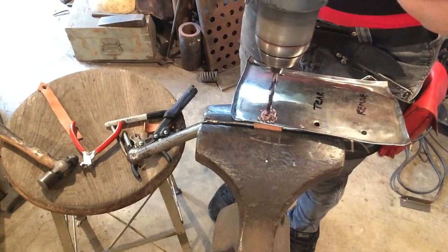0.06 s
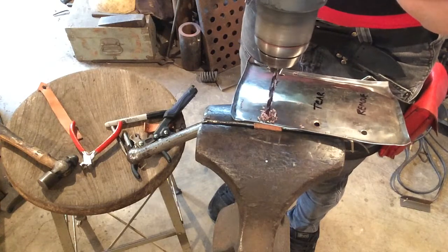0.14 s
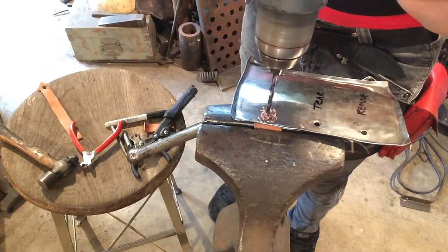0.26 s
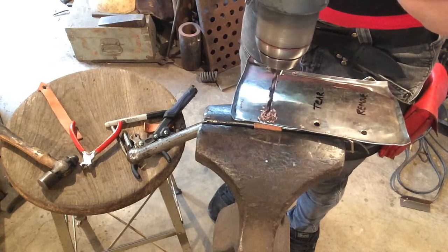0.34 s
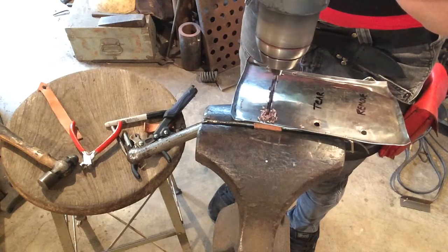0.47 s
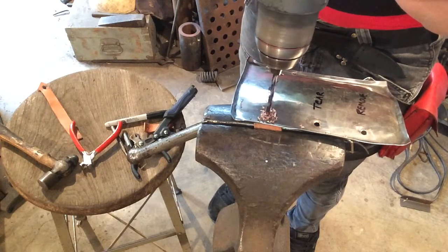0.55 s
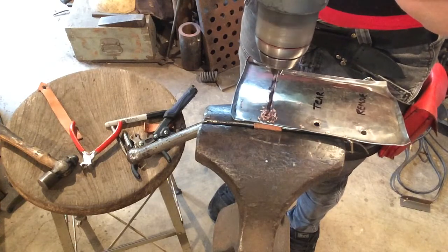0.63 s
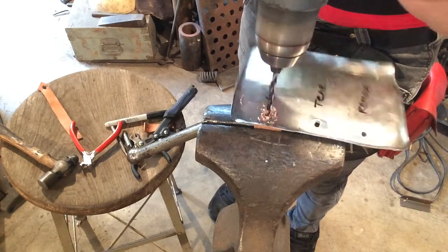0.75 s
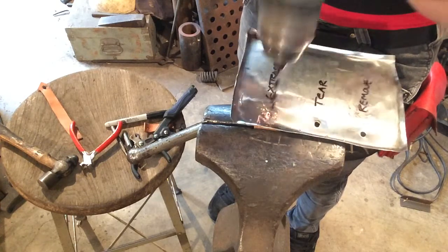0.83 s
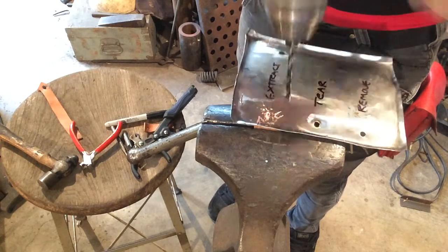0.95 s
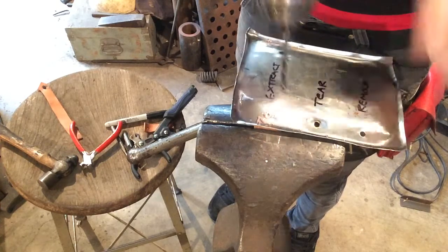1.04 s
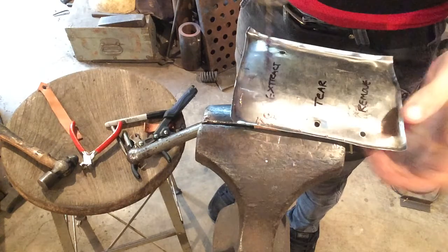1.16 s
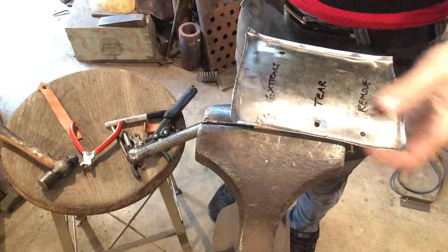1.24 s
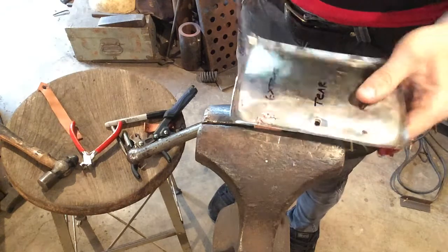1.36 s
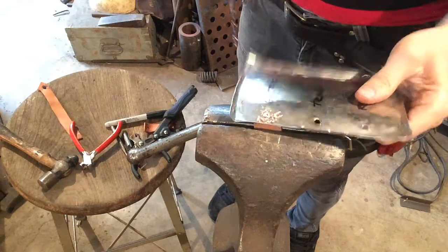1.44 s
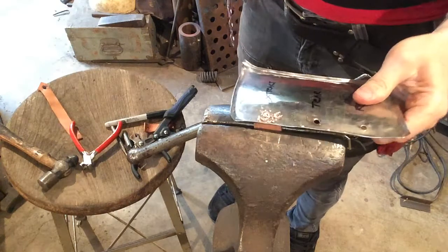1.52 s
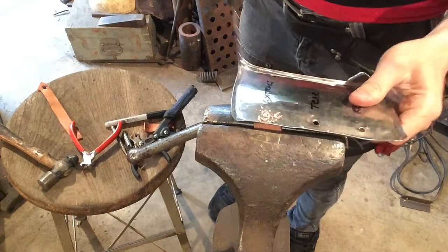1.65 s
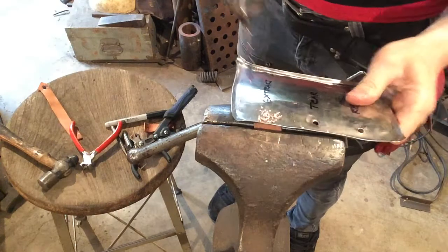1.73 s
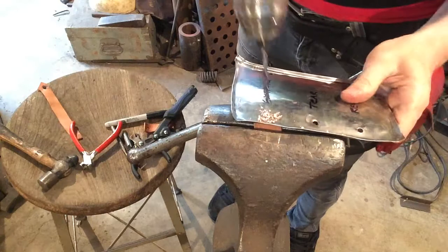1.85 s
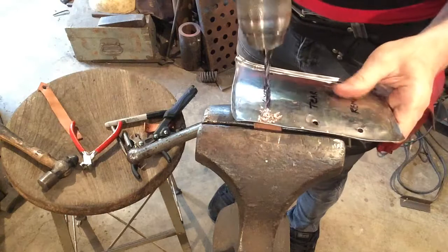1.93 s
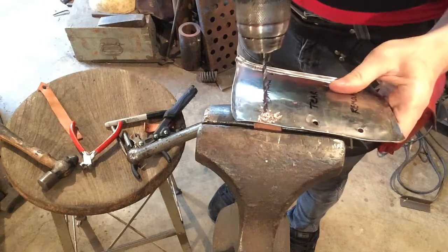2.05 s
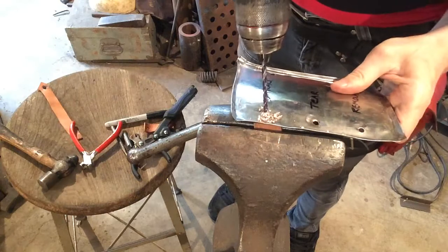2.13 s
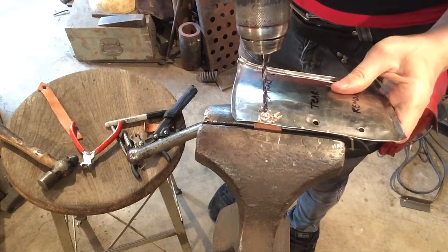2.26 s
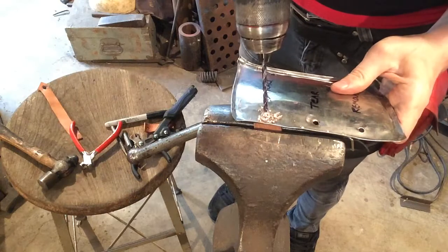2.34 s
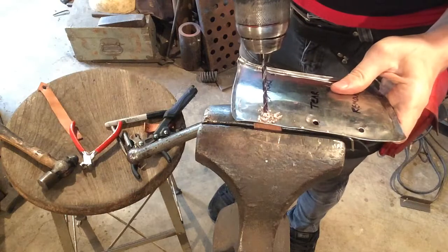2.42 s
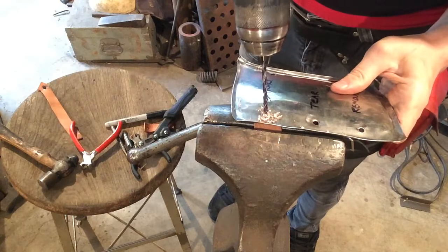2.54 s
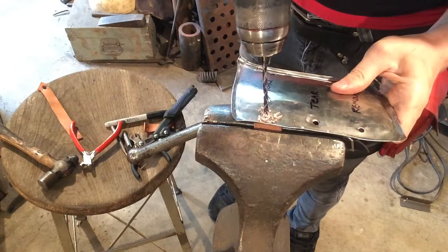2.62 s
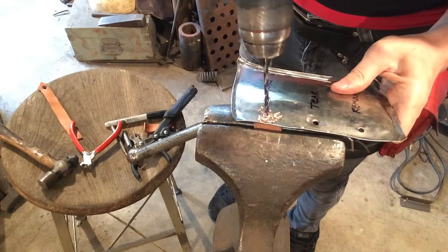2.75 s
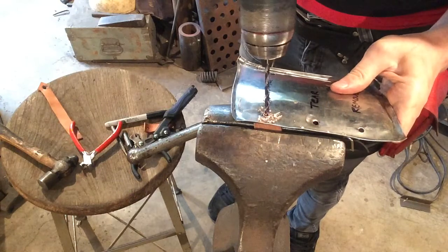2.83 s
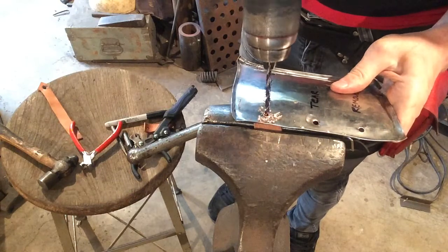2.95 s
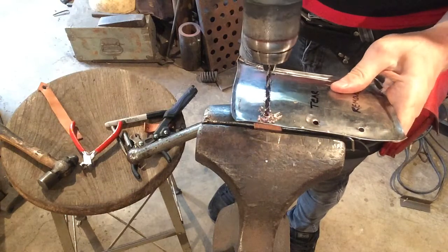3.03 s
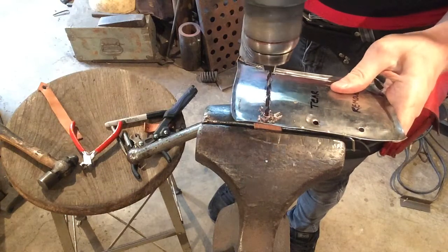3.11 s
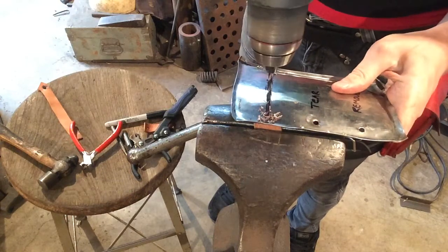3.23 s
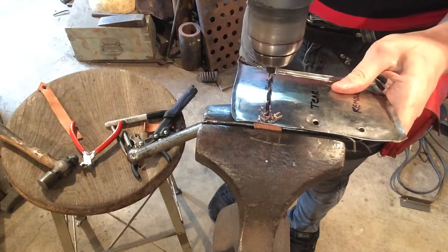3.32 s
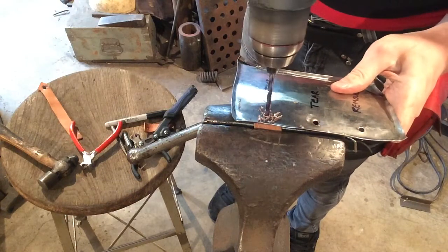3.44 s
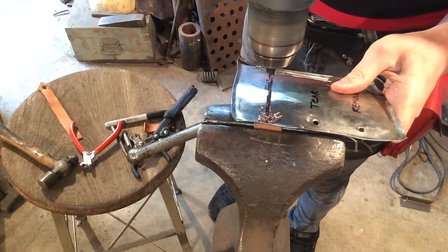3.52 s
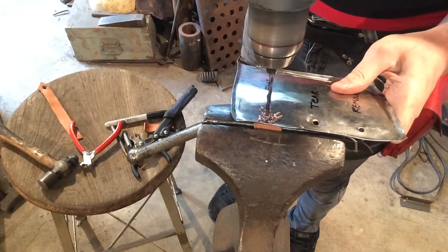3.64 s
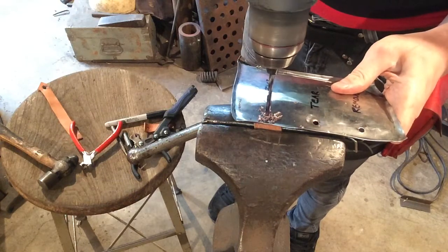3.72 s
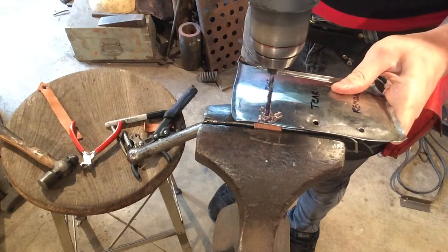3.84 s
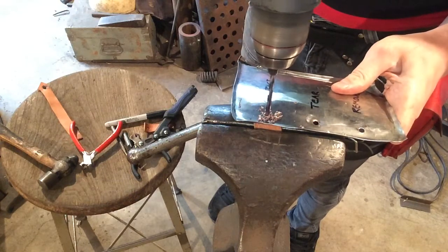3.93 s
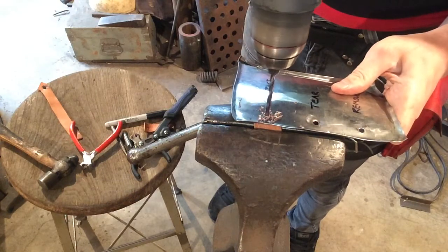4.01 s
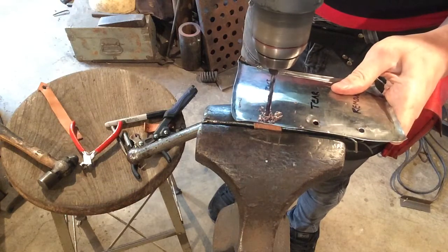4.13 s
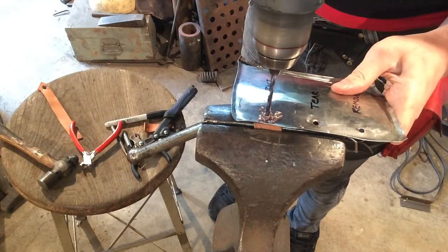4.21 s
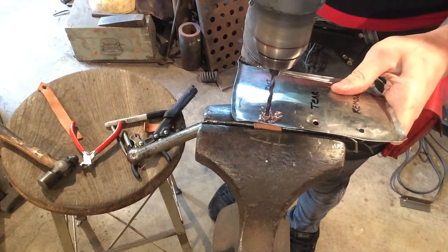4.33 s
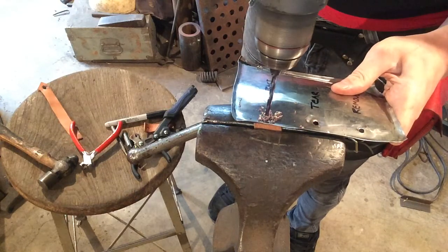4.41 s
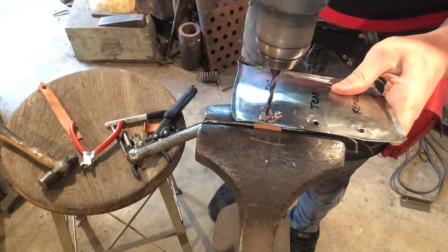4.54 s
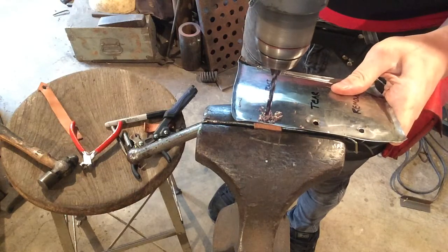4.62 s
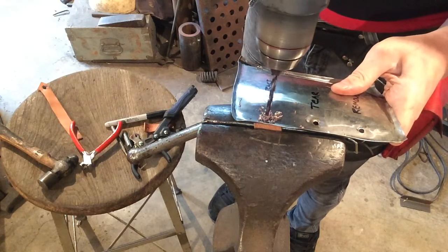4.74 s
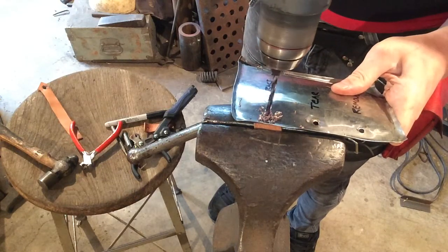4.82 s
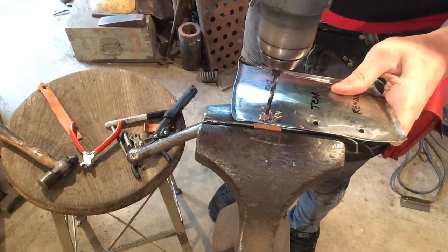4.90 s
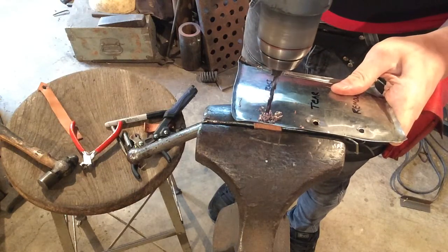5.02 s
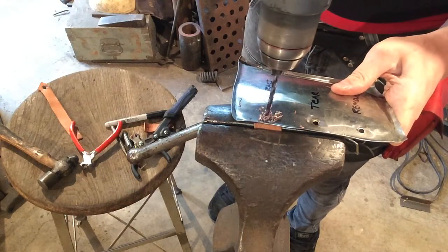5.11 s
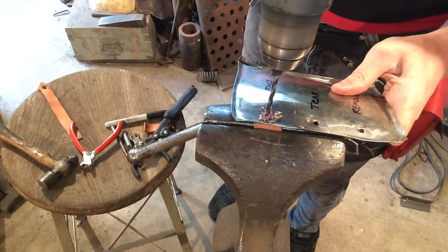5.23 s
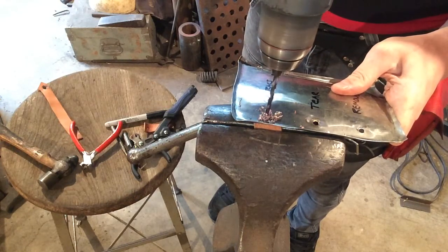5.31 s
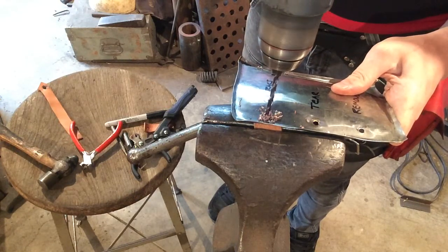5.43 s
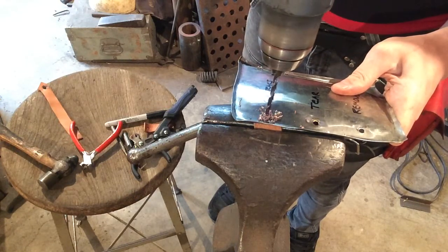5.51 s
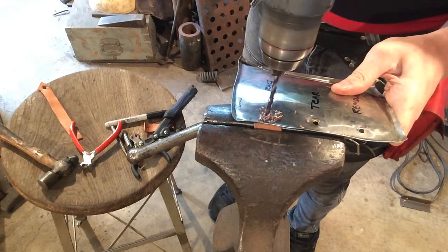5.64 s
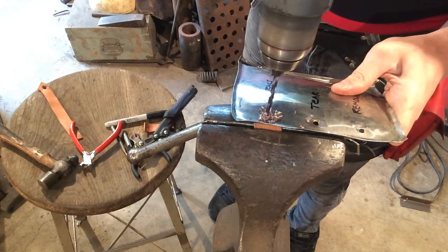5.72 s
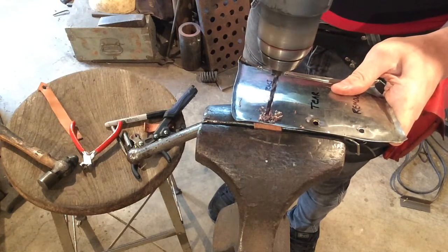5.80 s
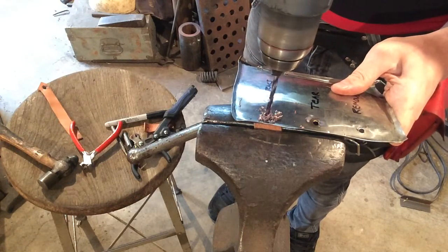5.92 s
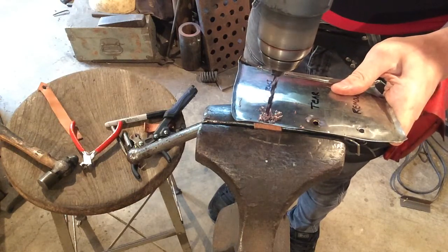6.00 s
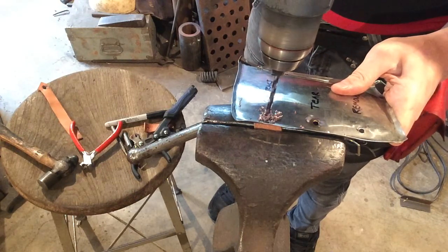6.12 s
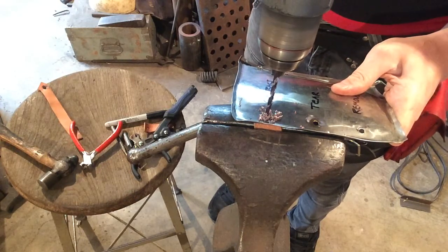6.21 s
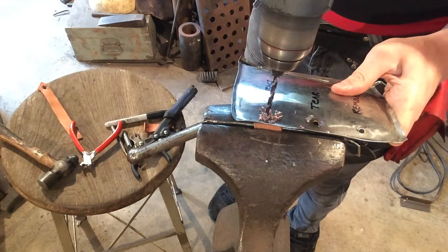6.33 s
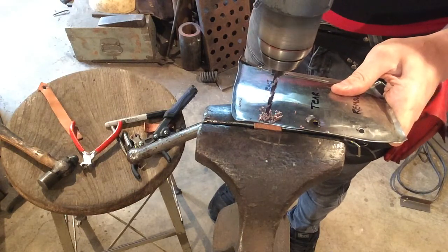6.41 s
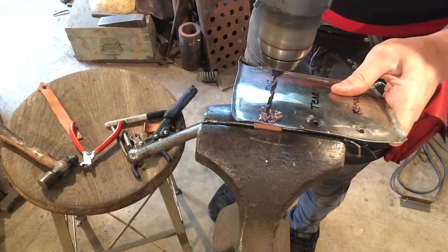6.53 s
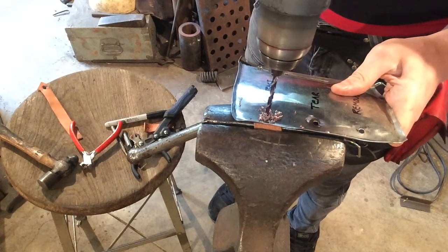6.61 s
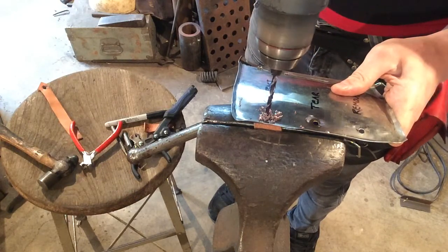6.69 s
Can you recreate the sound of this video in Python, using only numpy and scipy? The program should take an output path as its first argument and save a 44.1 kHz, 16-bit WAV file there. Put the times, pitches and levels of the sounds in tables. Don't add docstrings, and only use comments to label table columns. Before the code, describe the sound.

An electric drill whines through metal, brakes to a clunking stop, then after quiet handling and a small plate clank chatters back up to a faster scream.

```python
import sys
import numpy as np
from scipy import signal
from scipy.fft import rfft, irfft
from scipy.io import wavfile
from scipy.ndimage import uniform_filter1d

SR = 44100
rng = np.random.default_rng(int(sys.argv[2]) if len(sys.argv) > 2 else 0)


def invert_db(level):
    return 10 ** (np.asarray(level, dtype=float) / 20)


def transcribe(signal):
    frames = np.atleast_2d(signal).T
    limited = np.clip(frames, -1, 1)
    pcm = np.round(limited * 32767).astype(np.int16)
    wavfile.write(sys.argv[1], SR, pcm)


N = 298116
TIME_S = np.arange(N) / SR
BINS_HZ = np.arange(N // 2 + 1) * SR / N + 1e-3

# time_s, turns_hz
HELD_SPEED = [(0, 184.3), (.05, 185), (.24, 184.8), (.36, 180.8), (.43, 181.8), (.56, 184.3), (.7, 184.9),
              (.77, 186), (.86, 186.3), (5.2, 180.5), (5.35, 181.7), (5.48, 182.1), (5.65, 178.3),
              (5.9, 180.3), (5.98, 180.6), (6.06, 181.6), (6.26, 181), (6.38, 177.8), (6.47, 177.1),
              (6.55, 176.9), (6.68, 175.7), (6.76, 176.8)]
# time_s, push_db
FEED = [(0, 3), (.25, 2.5), (.55, 1), (.7, 3.5), (.86, 1.5), (.95, -4), (1.02, -12), (3.4, 7), (3.85, 5),
        (4.3, -4.5), (4.6, -5.5), (5.0, 0), (5.45, 1), (5.75, 0.5), (6.04, 0.5), (6.22, -1.5), (6.36, 2.5),
        (6.76, 4)]
# time_s, shift_hz, half_length_s
SPEED_DRIFT = [(3.43, -1.1, .06), (3.62, -.4, .18), (4.55, -1.1, .07), (4.86, .8, .13)]
# gap_hz still to gain, lag_s
SPIN_UP_LAGS = [
    (140, .066),
    (126, .25),
]
# time_s, shift_hz, half_length_s
SPIN_UP_DIP = [(3.207, -12.5, .021)]
LIFT_S, BRAKE_S, STOP_S, START_S, EASE_S = .68, .86, 1.015, 3.145, 4.45
BRAKE_HZ_PER_S, FREE_HZ, EASE_LAG_S, COAST_S = 222, 266.8, .3, 0.015

WHINE_ORDER, PARTNER_ORDER, TOOTH_ORDER, MERGING_ORDER = 16, 20, 14, 10
WHINE_DB, WHINE_PUSH, WHINE_WAVER_DB = -31.5, 0.53, 1.2
PARTNER_DB, PARTNER_FLAT_DB, PARTNER_DB_PER_OCTAVE = -47.5, -53.5, -9.5
PARTNER_LIFT_DB, PARTNER_BRAKE_DB, PARTNER_TORQUE = 10, -13, 4.36
LOCK_HZ = 138
TORQUE_DB, TORQUE_HZ_PER_S = 4, 390
OCTAVE_S, OCTAVE_DB, OCTAVE_HALF_S = 3.213, -44, .019
# centre_hz, width_hz, gain_db
VENTS = [(2935, 680, -0.5), (2677, 140, -1.5), (3780, 550, -12)]
VENT_STEEPNESS = 2.4
# time_s, change_db, half_length_s
WHINE_SWELLS = [(0, -8, 0.03), (.1, -1, .08), (.14, -2.5, 0.015), (.55, 2, 0.044), (.31, -17, 0.0074),
                (.4, -29, 0.017), (.476, -22, 0.0075), (.66, -10, 0.12), (.37, -13, 0.009), (.69, -4, .012),
                (.714, 7.5, 0.017), (.752, -8, .009), (.786, -8, 0.012), (.81, 3.5, 0.022), (.885, 0, .015),
                (3.238, -14, 0.013), (3.53, -6, 0.13), (3.35, -7.5, 0.036), (4.1, -1, 0.1), (4.245, 6.5, 0.016),
                (4.305, 11, 0.041), (4.43, 10, 0.013), (4.225, -21, 0.008), (4.372, -27, 0.0093),
                (4.405, -7, 0.016), (4.452, -27, 0.0055), (4.54, -2, 0.037), (4.61, -8, .028), (4.86, 0, .03),
                (4.66, -1, .02), (3.44, 2.5, .05), (3.75, 3.5, 0.13), (3.27, -3.5, 0.015), (4.88, -6.5, 0.1),
                (4.19, 2, 0.023), (5.135, -18, 0.0046), (5.308, -25, 0.0036), (5.436, -6, 0.0035),
                (5.48, 5.5, 0.017), (5.535, -14.5, 0.0044), (5.572, 3.5, 0.013), (5.592, -17, 0.0039),
                (5.62, -5, 0.022), (5.642, -14, 0.0036), (5.69, 2.5, 0.11), (5.91, -12, 0.011),
                (6.012, -10, 0.012), (6.13, 5, 0.0062), (6.176, 2.5, 0.01), (6.196, -17, 0.0062),
                (6.23, -9, 0.019), (6.338, 2.5, 0.043), (6.436, 2.5, 0.019), (6.59, 2, 0.016)]
# time_s, change_db, half_length_s
PARTNER_SWELLS = [(.025, 8, 0.016), (.15, 8.5, 0.08), (.29, 7.5, .04), (4.76, -0.5, .2), (6.15, 2, .15),
                  (5.3, 0, 0.11), (4.76, -1, 0.086), (3.52, 2, .05), (.4, 5, .06), (.53, -10, 0.058),
                  (.63, 8, 0.04), (3.216, 0, 0.0098), (3.243, 4, 0.014), (0.065, -10.5, .015),
                  (.23, -7.5, .01), (.68, 0, .04), (3.28, -3, 0.028), (0.85, 9, 0.06), (3.39, 3.5, 0.054),
                  (5.3, -2, .06), (5.6, 8, 0.046), (4.5, 3, .06), (5.92, 1, .03), (6.1, 0, .06),
                  (6.8, 2, .03), (6.55, 0, 0.063)]

# turns_hz, plate_rumble_db, chopper_db, unbalance_db
BY_SPEED = [(59, -61, -77, -82), (124.7, -63.5, -71.5, -80.5), (183.8, -47.5, -54, -62),
            (187.8, -47.5, -67, -70.5), (225.6, -40, -50.5, -66), (277, -38.5, -48, -53)]
LIFT_DB, BRAKE_RUMBLE_DB, BRAKE_CHOP_DB = -7.5, 8, -17
ORDERS = (4, 8, 9, 10, 12, 13, 26, 29.7)
# part_speed_db, middle_speed_db, full_speed_db
ORDER_LEVELS = [(-5.5, -9, -7), (-11, -5, -2), (-7, -23, -15), (-20.5, -15, 2.5), (-10, -12, -27),
                (-10, -17, -7.5), (-12, -20.5, -19), (-21, -10.5, -31)]
CRAWL_HZ, PART_HZ, MIDDLE_HZ, FULL_HZ, CRAWL_DB = 110, 182, 226, 262, -30
ORDER_TORQUE, TOOTH_TORQUE, TOOTH_DB = 0.62, 1.1, -39.5
# cycles_per_turn, time_s, change_db, half_length_s
ORDER_SWELLS = [(4, 0.77, -5, .04), (29.7, 4.72, 12, .07), (26, 3.45, 4, .12), (8, 3.42, 0, 0.17),
                (8, 4.8, 0.5, .2), (4, 7.4, 4, 0.077), (4, .55, 4.5, 0.26), (4, 5.5, 0, .2),
                (4, 6.5, 5, 0.22), (8, 0.5, -5.5, .5), (8, 5.7, 0.5, 0.54), (8, 6.7, -6, .15),
                (9, 1.4, 9, 0.087), (9, 4.9, -7, 0.18), (10, 5, 12.5, 0.45), (12, 3.42, -1, .12),
                (12, .12, 10.5, .06), (13, 2, 5, 0.13), (13, 4.4, -2, 0.1), (13, 6.1, 1, 0.44),
                (13, .3, -3.5, .15), (14, .25, 2, .3), (14, 3.6, 9, .1), (14, 4.76, -2, 0.1),
                (14, 4.93, 4, 0.064), (14, 4.79, -8, 0.01), (14, 4.61, -6, .012), (14, 4.57, 7, .025),
                (8, 3, 4.5, 0.053), (13, 4.5, 11, .04), (4, .15, 0.5, .2), (4, 5.9, 0, .4),
                (14, 6.05, -4.5, 0.47)]
# time_s, change_db, half_length_s
MERGE = [(4.33, -22, .075)]
# centre_hz, width_hz, gain_db
HOUSING = [(2900, 380, 10)]
# centre_hz, width_hz, gain_db
TOOTH_RING = [(2906, 343, 0)]

CHOPPER_HZ, CHOP_TORQUE = 7976., 2.7
# cycles_per_turn, level_db
SIDEBANDS = [(-4, 1), (0, -14), (4, -2), (8, -16), (20, -6.5), (28, -15)]
# centre_hz, width_hz, gain_db
SHELL = [(7420, 290, 11.5), (8900, 1100, 11)]
# time_s, change_db, half_length_s
CHOPPER_SWELLS = [(.4, 5, 0.5), (3.225, 9, 0.019), (3.36, 6.5, 0.057), (4.53, -4.5, 0.059), (5.3, -7, 0.17)]
# time_s, change_db, half_length_s
LOWER_SWELLS = [(0.9, 5, .1), (3.17, -20, 0.028), (4.1, -8, 0.22), (5.3, 8, .12), (4.8, 2, .2),
                (3.29, -4, .015), (5.9, 5, 0.56), (4.6, -16, .05)]
# time_s, change_db, half_length_s
UPPER_SWELLS = [(3.16, 4, .02), (2.6, 9, 0.013), (3.245, -13, .008), (.85, -2.5, .1), (5.5, -4, .2)]
FOLD_20_DB, FOLD_20_DB_PER_HZ, FOLD_20_HZ, EASE_FOLD_DB = -38, .3, 243, -10
FOLD_28_DB, FOLD_28_DB_PER_HZ, FOLD_28_TOP_HZ = -46.5, -0.2, 180.2
# time_s, change_db, half_length_s
FOLD_28_FADES = [(.17, 0, .12), (.52, -10, 0.069), (5.1, -13, 0.17), (6.65, -6, 0.11)]
# first_run_db, second_run_db
TWICE_LEVELS = (-75, -61)

GEAR_DB, GEAR_DB_PER_OCTAVE, GEAR_PUSH = -49, 7, 0.32
# pitch_hz, density_db
GEARS = [(53, -47), (90, -38.5), (179, -23.5), (231, -16), (501, -10.5), (662, -5.5), (721, -2.5),
         (1110, -9.5), (1600, -4.5), (2560, -4), (2910, 1.5), (4280, -5), (5050, -4.5), (5750, -7),
         (6720, -6.5), (15200, -30)]
# time_s, change_db, half_length_s
SLACK = [
    (.92, -2, 0.037),
    (1.0, 0, 0.033),
    (3.192, -4, 0.01305),
]
# centre_hz, width_hz, gain_db
FAN = [(11900, 9700, 0)]
# centre_hz, width_hz, gain_db
CUT_RING = [(4170, 530, -4), (4900, 460, -4), (6420, 450, 1), (6730, 300, -2)]
FAN_DB, CUT_RING_DB = -8, -3
# centre_hz, width_hz, gain_db
RUMBLE = [(796, 260, 10), (374, 156, 4), (1240, 470, 4.5)]

# pitch_hz, density_db
SHOP = [(15, -40), (25, -16), (98, -1), (177, -7), (238, -11.5), (504, -15.5), (695, -22.5), (839, -18.5),
        (1870, -25), (3290, -28), (3870, -31), (15200, -40.5)]
SHOP_DB = -67
# time_s, peak_db,
# centre_hz, decay_s, plate_share
TAPS = [(1.017, -32.5, 1630, 0.0054, 0.53), (1.036, -45.5, 580, 0.022, 0.1),
        (1.023, -44.5, 3500, 0.047, 0.3), (3.146, -38.5, 1205, 0.12, 0.6), (2.191, -54.5, 4600, 0.002, 0),
        (2.206, -62, 3000, .006, 0), (6.028, -41, 9000, .008, 0), (2.198, -57.5, 500, 0.0077, 0),
        (2.199, -63, 1800, 0.019, .1), (2.2356, -59, 4230, 0.0094, 0), (2.239, -57, 1200, 0.0044, 0),
        (2.626, -58, 2480, 0.0024, 0.04), (2.6281, -46.5, 1000, 0.0053, 0.1),
        (2.631, -54, 200, 0.036, 0.04), (2.694, -64, 1100, .006, 0.05), (2.828, -61, 1000, 0.0044, 0.2),
        (2.836, -61, 5200, 0.03, 0), (2.847, -60, 5400, .02, 0), (2.859, -53, 400, 0.011, 0),
        (2.862, -46.5, 1200, 0.009, 0.1), (.885, -42.5, 834, .03, 0), (2.8633, -39, 4400, 0.0018, 0.2),
        (2.862, -51, 12600, 0.012, 0.35), (2.866, -50, 6500, 0.041, 0.85), (3.055, -68, 6000, 0.0032, .2)]
# centre_hz, width_hz, gain_db
PLATE = [(550, 150, -7), (1200, 71, 1), (1620, 100, -2), (2380, 110, 9), (3760, 500, 2), (6270, 100, 9),
         (6290, 73, -1), (8110, 230, -17.5)]
# time_s, peak_db, ring_share, push_s
KNOCKS = [(1.017, -21, 0.72, .0005), (1.021, -28, 0.9, 0.0006), (1.031, -43, 0.4, 0.0012),
          (1.072, -45, 0.2, .001), (3.1436, -37, 0.8, 0.002), (3.148, -33, .9, .001),
          (3.152, -25, 0.88, .0006), (3.158, -27, 0.98, .001), (3.162, -25, 1, .001),
          (3.165, -31, 0.86, .0008), (3.168, -31.5, 0.92, .0008), (3.1701, -22, 1, .0006),
          (3.1744, -24, 0.9, 0.00091), (3.177, -28.5, 0.9, .0006), (3.181, -32.5, 1, 0.0011),
          (3.185, -32, 0.97, 0.00093), (3.195, -30, 0.96, 0.0016), (3.199, -34, 1, .0015),
          (3.202, -29, 1, .001), (3.206, -28, 1, .001), (3.211, -24, 1, .001), (3.213, -31, 1, .001),
          (3.217, -27, 0.97, .001), (3.2216, -21.5, 0.9, .001)]
# pitch_hz, level_db, t60_s
LOCK_MODES = [(1700, -8, .01), (2400, -10, .008), (3050, 0, .011), (5200, -10, .006), (7200, -11, .006)]
# pitch_hz, level_db, t60_s
KNOCK_MODES = [(1790, -25, 0.012), (2824, -7, 0.017), (3000, -3, 0.0085), (3550, -8.5, 0.0085),
               (4770, -18, 0.0099), (8090, -21.5, 0.019)]
# start_s, length_s, level_db
SLIDES = [(1.128, 0.095, -83), (1.332, 0.07, -73.5), (1.448, 0.22, -84.5), (1.734, 0.18, -80),
          (2.015, 0.094, -76.5), (2.268, .02, -85), (2.35, 0.032, -93), (2.684, 0.14, -96)]
# pitch_hz, density_db
SLIDE_COLOUR = [(1180, -20), (2000, -3.5), (3330, -9), (3980, 2.5), (4400, -6), (9770, -8), (15200, -12.5)]
SLIDE_ATTACK_S, SLIDE_RELEASE_S = .02, 0.033
# time_s, peak_db
BIT_SET = (2.6305, -46.5)
# pitch_hz, level_db, t60_s
BIT_MODES = [(867, -12, .035), (1500, -5, .02), (1701, 0, .03), (3914, -16, .015)]
# time_s, peak_db
PLATE_DROP = (2.8618, -42.5)
# pitch_hz, level_db, t60_s
DROP_MODES = [(1227, -4, .04), (2449, -5, .04), (3924, -9, .02), (6164, -3, .06), (6390, -5, .12),
              (8231, -12, .04)]
ROOM_T60_S, ROOM_DB, ROOM_TOP_HZ = 0.28, -17.5, 6000
TOP_HZ = 15340


def level(x, db):
    return x * invert_db(db) / np.sqrt(np.mean(x ** 2))


def band_level(x, lo_hz, hi_hz):
    part = rfft(x) * (BINS_HZ > lo_hz) * (BINS_HZ < hi_hz)
    return x / np.std(irfft(part, N))


def walk(rate_hz):
    hold = max(int(SR / rate_hz), 2)
    held = np.repeat(rng.standard_normal(N // 40), hold)[:N]
    return 1.3 * uniform_filter1d(uniform_filter1d(held, hold), hold)


def curves(rows):
    time_s, *columns = np.transpose(rows)
    return [np.interp(TIME_S, time_s, c) for c in columns]


def bumps(rows):
    return sum(change * np.exp(-((TIME_S - s) / half_s) ** 2) for s, change, half_s in rows)


def until_restart(start_s):
    gate = (TIME_S > start_s) & (TIME_S < START_S)
    return uniform_filter1d(1. * gate, size=3000)


def resonances(hz, modes):
    return sum(invert_db(2 * db) / (1 + ((hz - f * f / hz) / width) ** 2) for f, width, db in modes)


def resonant_noise(modes):
    return irfft(rfft(rng.standard_normal(N)) * resonances(BINS_HZ, modes), N)


def noise(colour, flicker_db, rate_hz):
    f, db = np.transpose(colour)
    spectrum = rfft(rng.standard_normal(N)) * invert_db(np.interp(np.log(BINS_HZ), np.log(f), db))
    place = 2 * np.log2(BINS_HZ / 20)
    out = np.zeros(N)
    for k in range(21):
        window = np.cos(np.pi / 2 * np.clip(place - k, -1, 1)) ** 2
        out += irfft(spectrum * window, N) * invert_db(flicker_db * walk(rate_hz))
    return out


def line(phase, db, waver_db):
    return np.sqrt(2) * invert_db(db + waver_db * walk(25.13)) * np.sin(phase + rng.uniform(0, 2 * np.pi))


def shaft():
    held_hz, = curves(HELD_SPEED)
    since_s = np.maximum(TIME_S - START_S, 0)
    up_hz = FREE_HZ - sum(gap * np.exp(-since_s / lag) for gap, lag in SPIN_UP_LAGS) + bumps(SPIN_UP_DIP)
    ease = np.exp(-np.maximum(TIME_S - EASE_S, 0) / EASE_LAG_S)
    second_hz = bumps(SPEED_DRIFT) + held_hz + (up_hz - held_hz) * ease
    first_hz = held_hz - BRAKE_HZ_PER_S * np.maximum(TIME_S - BRAKE_S, 0)
    gain = sum(gap / lag * np.exp(-since_s / lag) for gap, lag in SPIN_UP_LAGS) * (TIME_S > START_S)
    return np.maximum(np.where(TIME_S < START_S, first_hz, second_hz), 20), gain


def vents_db(hz):
    return VENT_STEEPNESS * 10 * np.log10(resonances(np.maximum(hz, 50), VENTS))


def loose_db(hz):
    return 0.27 * np.minimum(hz - LOCK_HZ, 0)


def by_speed(hz, column):
    table = np.transpose(BY_SPEED)
    return np.interp(hz, table[0], table[column])


def swells(order):
    return bumps([row[1:] for row in ORDER_SWELLS if row[0] == order])


def magnet_whine(hz, turn, field_db, swell_db):
    whine_db = WHINE_DB + loose_db(hz) + field_db + swell_db + vents_db(WHINE_ORDER * hz)
    flat_db = PARTNER_FLAT_DB + PARTNER_DB_PER_OCTAVE * np.log2(np.maximum(hz / PART_HZ, 1))
    partner_db = np.maximum(PARTNER_DB + vents_db(PARTNER_ORDER * hz), flat_db)
    partner_db = partner_db + PARTNER_LIFT_DB * until_restart(LIFT_S) + PARTNER_BRAKE_DB * until_restart(BRAKE_S)
    partner_db = partner_db + loose_db(hz) + bumps(PARTNER_SWELLS) + PARTNER_TORQUE * field_db
    whine = line(WHINE_ORDER * turn, whine_db, WHINE_WAVER_DB)
    partner = line(PARTNER_ORDER * turn, partner_db, 1.2)
    octave = line(2 * WHINE_ORDER * turn, OCTAVE_DB, 2.5)
    return whine + partner + octave * np.exp(-((TIME_S - OCTAVE_S) / OCTAVE_HALF_S) ** 2)


def unbalance(hz, turn):
    return line(turn, by_speed(hz, 3) + LIFT_DB * until_restart(LIFT_S), 0.71)


def shaft_orders(hz, turn, gear_db, field_db):
    out = np.zeros(N)
    shared_db = gear_db + ORDER_TORQUE * field_db + 0.29 * bumps(WHINE_SWELLS)
    for order, levels_db in zip(ORDERS, ORDER_LEVELS):
        speed_db = np.interp(hz, (CRAWL_HZ, PART_HZ, MIDDLE_HZ, FULL_HZ), (CRAWL_DB, *levels_db))
        db = shared_db + swells(order) + speed_db
        if order == MERGING_ORDER:
            db = db + bumps(MERGE)
        out += line(order * turn, db, 1.3) * np.sqrt(1 + resonances(order * hz, HOUSING))
    tooth_db = TOOTH_DB + swells(TOOTH_ORDER) + loose_db(hz) + TOOTH_TORQUE * field_db
    tooth = line(TOOTH_ORDER * turn, tooth_db + LIFT_DB * until_restart(BRAKE_S), 1.3)
    return out + tooth * (0.14 + resonances(TOOTH_ORDER * hz, TOOTH_RING))


def chopper_tones(hz, turn, field_db, swell_db):
    chop = 2 * np.pi * CHOPPER_HZ * TIME_S
    brake_db = BRAKE_CHOP_DB * until_restart(BRAKE_S)
    shared_db = by_speed(hz, 2) + brake_db + CHOP_TORQUE * field_db + 0.49 * walk(19) + bumps(CHOPPER_SWELLS) - 12.0
    out = np.zeros(N)
    for k, db in SIDEBANDS:
        own_db = db + bumps(LOWER_SWELLS if k < 0 else UPPER_SWELLS)
        shell = np.sqrt(1 + resonances(CHOPPER_HZ + k * hz, SHELL))
        out += line(chop + k * turn, shared_db + own_db, 1.4) * shell

    fold_20_db = FOLD_20_DB + swell_db + EASE_FOLD_DB * np.clip((TIME_S - EASE_S) / 0.071, 0, 1)
    fold_20_db = fold_20_db + FOLD_20_DB_PER_HZ * np.minimum(hz - FOLD_20_HZ, 0)
    fold_28_db = FOLD_28_DB + bumps(FOLD_28_FADES) + brake_db
    fold_28_db = fold_28_db - FOLD_28_DB_PER_HZ * np.maximum(hz - FOLD_28_TOP_HZ, 0)
    for order, db in ((20, fold_20_db), (28, fold_28_db)):
        out += line(chop - order * turn, db + vents_db(CHOPPER_HZ - order * hz), 0.67)

    twice_db = np.where(TIME_S < START_S, *TWICE_LEVELS) + 8 * until_restart(LIFT_S - .15)
    return out + line(2 * chop - 4 * turn, twice_db + bumps([(5.9, -3, .5)]), 1.2)


def gear_noise(turn, gear_db):
    clatter = band_level(noise(GEARS, flicker_db=1.06, rate_hz=22), 4846, 5920) * (1 + 0.054 * np.sin(turn))
    fan = level(resonant_noise(FAN), FAN_DB)
    cut = level(resonant_noise(CUT_RING), CUT_RING_DB) * invert_db(2.5 * walk(30))
    return invert_db(gear_db - 1.57) * (clatter + fan + cut)


def plate_rumble(hz):
    db = by_speed(hz, 1) + BRAKE_RUMBLE_DB * until_restart(BRAKE_S)
    return band_level(resonant_noise(RUMBLE), 550, 1020) * invert_db(db - 8.0 + 1.6 * walk(20.99))


def drill():
    push_db, = curves(FEED)
    hz, gain_hz_per_s = shaft()
    turn = 2 * np.pi * np.cumsum(hz * (1 + 0.001191 * walk(40))) / SR
    field_db = TORQUE_DB * np.tanh(gain_hz_per_s / TORQUE_HZ_PER_S)
    swell_db = WHINE_PUSH * push_db + bumps(WHINE_SWELLS)
    gear_db = GEAR_DB + GEAR_DB_PER_OCTAVE * np.log2(hz / PART_HZ) + GEAR_PUSH * push_db + bumps(SLACK)
    run_out = np.exp(-np.maximum(TIME_S - STOP_S, 0) / COAST_S)
    running = np.where(TIME_S < START_S, run_out, np.minimum((TIME_S - START_S) / 0.0023, 1))
    tones = magnet_whine(hz, turn, field_db, swell_db) + unbalance(hz, turn)
    tones = tones + shaft_orders(hz, turn, gear_db, field_db) + chopper_tones(hz, turn, field_db, swell_db)
    return running * (tones + gear_noise(turn, gear_db) + plate_rumble(hz))


def shop_hum():
    return level(noise(SHOP, flicker_db=-1.5, rate_hz=9.1), SHOP_DB)


def room(x):
    t = TIME_S[:SR // 2]
    tail = rng.standard_normal(len(t)) * np.exp(-np.log(1000) * t / ROOM_T60_S) * (t > .004)
    tail = signal.lfilter(*signal.butter(1, ROOM_TOP_HZ, fs=SR), tail)
    return signal.fftconvolve(x, tail / np.sqrt(np.sum(tail ** 2)))[:N] * invert_db(ROOM_DB)


def add(out, start_s, sound):
    i = int(start_s * SR)
    out[i:i + len(sound)] += sound[:N - i]


def tap(centre_hz, decay_s, plate_share):
    t = TIME_S[:SR // 5]
    scuff = rng.standard_normal(len(t)) * np.exp(-t / decay_s)
    colour = signal.iirpeak(centre_hz, 0.42 + centre_hz / 8000, fs=SR)
    direct = signal.lfilter(*colour, signal.lfilter(*colour, scuff))
    plate = sum(invert_db(db) * signal.lfilter(*signal.iirpeak(f, f / width, fs=SR), scuff) for f, width, db in PLATE)
    blow = plate_share * plate / abs(plate).max() + (1 - plate_share) * direct / abs(direct).max()
    return blow / abs(blow).max()


def taps_and_thuds():
    out = np.zeros(N)
    for s, db, *touch in TAPS:
        add(out, s, invert_db(db) * tap(*touch))
    return out


def ring(modes, tilt_db, share, crack_s, push_s):
    t = TIME_S[:SR // 5]
    share = np.clip(share, 0, 1)
    tones = np.zeros(len(t))
    for f, db, t60_s in modes:
        level_chance, pitch_chance = rng.standard_normal(2)
        mode_db = db + 2 * level_chance + tilt_db * np.log2(f / 2000)
        tone = np.sin(2 * np.pi * f * (1 + 0.016 * pitch_chance) * t)
        tones += invert_db(mode_db) * tone * np.exp(-np.log(1000) * t / t60_s)
    crack = rng.standard_normal(len(t)) * np.exp(-t / crack_s)
    crack = signal.lfilter([1, -.9], [1, -1.1, .45], crack)
    blow = share * tones / abs(tones).max() + (1 - share) * crack / abs(crack).max()
    blow = blow * (1 - np.exp(-t / push_s))
    return blow / abs(blow).max()


def gear_knocks():
    out = np.zeros(N)
    for s, db, share, push_s in KNOCKS:
        modes = KNOCK_MODES if s > START_S - 1 else LOCK_MODES
        add(out, s, invert_db(db) * ring(modes, -0.81, share, 0.0012, push_s))
    return out


def finger_slides():
    strokes = np.zeros(N)
    for s, length_s, db in SLIDES:
        outside = np.maximum((s - TIME_S) / SLIDE_ATTACK_S, (TIME_S - s - length_s) / SLIDE_RELEASE_S)
        strokes += invert_db(db) * np.exp(-outside.clip(0))
    return strokes * band_level(noise(SLIDE_COLOUR, flicker_db=0.0, rate_hz=24), 3300, 13900)


def set_downs():
    out = np.zeros(N)
    add(out, BIT_SET[0], invert_db(BIT_SET[1]) * ring(BIT_MODES, 0, .9, 0.0022, .002))
    add(out, PLATE_DROP[0], invert_db(PLATE_DROP[1]) * ring(DROP_MODES, 0, .65, 0.0018, 0.00069))
    return out


def scene():
    near = drill() + taps_and_thuds() + gear_knocks() + finger_slides() + set_downs()
    mono = near + room(near) + shop_hum()
    return np.array([mono, mono])


def top_cut(x):
    return signal.sosfilt(signal.butter(12, 15330, fs=SR, output="sos"), x)


def record(dry):
    low_pass = signal.ellip(8, .2, 70, TOP_HZ, fs=SR, output="sos")
    mix = signal.sosfilt(low_pass, dry)
    return top_cut(mix)


dry = scene()
out = record(dry)
transcribe(out)
```